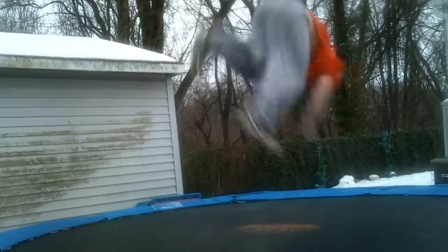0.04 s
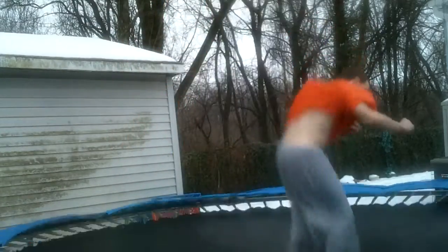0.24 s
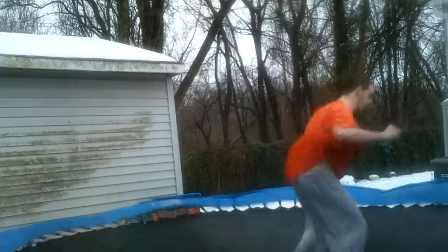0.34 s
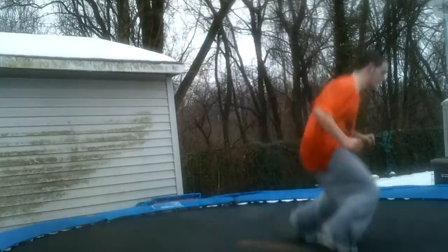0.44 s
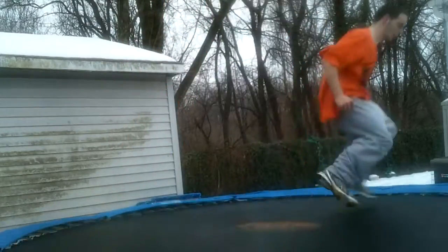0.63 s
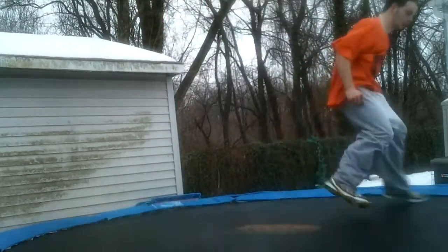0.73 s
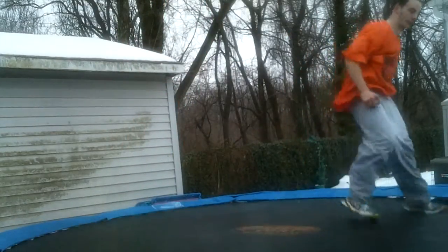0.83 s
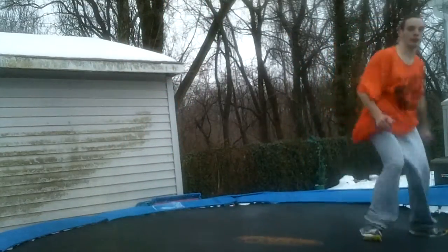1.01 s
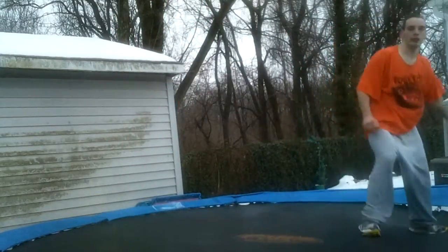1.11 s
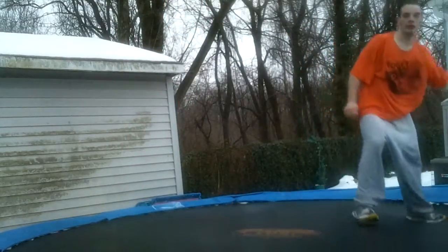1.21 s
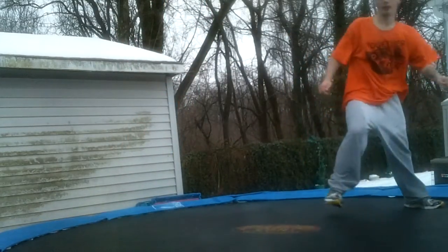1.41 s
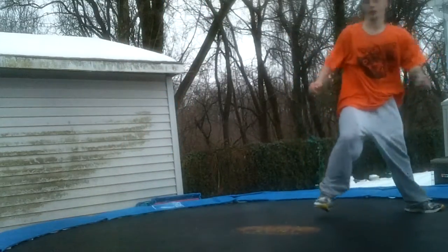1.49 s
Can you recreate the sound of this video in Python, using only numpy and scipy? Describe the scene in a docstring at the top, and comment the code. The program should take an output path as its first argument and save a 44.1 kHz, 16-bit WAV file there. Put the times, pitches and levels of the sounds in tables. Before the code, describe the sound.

A trampoline mat thumps under a jumper, then its pads slap and metal springs clank and squeak on the rebound. Quieter steps and a shoe swish follow, heard close by outdoors with light wind on the microphone.

```python
"""A bounce on a garden trampoline

A jumper lands, rebounds and takes a few small steps. The mat thumps, hisses and swishes under the shoes.
As it snaps back, pads slap the frame and the steel springs rattle, chirp and ring.
Light wind rumbles on a small camera at the rim, whose housing cuts narrow notches into the treble."""
import sys
import numpy as np
from scipy import signal
from scipy.fft import rfft, irfft
from scipy.io import wavfile
from scipy.ndimage import map_coordinates

SR = 44100
rng = np.random.default_rng(int(sys.argv[2]) if len(sys.argv) > 2 else 0)


def wav_record(signal):
    """Record a signal, one row per channel, as 16-bit PCM in the file named by sys.argv[1]."""
    frames = np.transpose(np.atleast_2d(signal))
    bounded = np.clip(frames, -1, 1)
    # unit amplitude maps onto the largest positive 16-bit level
    quanta = np.round(bounded * 32767).astype(np.int16)
    wavfile.write(sys.argv[1], SR, quanta)


N = 68355

# Wind gusts. Each row: time in seconds, level in dB.
WIND_LEVELS = [(0, -41), (.17, -41), (.22, -31), (.3, -34), (.45, -34), (.62, -33.5), (.72, -43.5),
               (.82, -32), (.96, -48), (1.05, -39), (1.2, -41.5), (1.4, -38.5), (1.45, -46.5), (1.55, -42)]
# The tone of each noise, from low to high. Each row: frequency in Hz, relative level in dB.
WIND_TONE = [(12, 5), (25, 5.5), (45, 0.5), (75, 3.5), (115, -9.5), (160, -19.5), (260, -33), (600, -52.5)]
HUSH_TONE = [(60, 13), (200, -3.5), (500, 0), (1100, -4), (1900, -10), (3200, -23), (4700, -13),
             (6500, -22.5), (8200, -31), (10000, -24.5), (15000, -27.5)]
SCUFF_TONE = [(500, -1.5), (2500, -26), (4800, 3.5), (7000, -4.5), (8500, -8), (10200, -1), (12000, -4.5),
              (14000, -12.5), (15500, -33)]
SLIDE_TONE = [(200, -26), (620, -6), (1000, -5), (2200, -2), (3200, -2), (4400, 2), (5200, 2), (6200, -28),
              (9000, -24), (15000, -34)]
TICK_TONE = [(1000, -10), (5000, 0.5), (9000, -4), (9800, -14), (10400, -9), (11400, -5), (15000, -29)]
STEEL_TONE = [(300, -13.5), (1200, -6), (2200, -3.5), (3300, -2.5), (4400, -0.5), (5100, 1.5), (5900, -4.5),
              (6900, -11), (8200, -22), (10000, -15.5), (15000, -34.5)]
SLAP_TONE = [(60, -15), (125, 0), (160, -9.5), (200, 3), (400, -10), (600, -7.5), (900, -9.5), (1200, -11),
             (1600, -12.5), (2100, -16), (3500, -22), (7000, -22.5), (15000, -63)]
# Bursts of noise. Each row: peak time in seconds, level in dB, rise and fall times in seconds.
MAT_SCUFFS = [(.312, -48, 0.00093, .014), (.331, -37.5, 0.0057, 0.014), (.354, -32.5, 0.01, 0.02),
              (.46, -48.5, 0.052, 0.036), (.53, -46, 0.0065, 0.15), (.645, -40.5, 0.0016, 0.0026),
              (.96, -50.5, 0.023, 0.014), (1.02, -51.5, 0.034, 0.051), (1.072, -55.5, 0.031, 0.013),
              (1.166, -58, .002, 0.023), (1.31, -54, 0.0023, .006), (1.332, -56.5, 0.0064, .01),
              (1.375, -53.5, 0.0077, 0.0075)]  # shoes and clothes brushing the mat
SOLE_SLIDES = [(1.062, -44.5, 0.025, 0.018)]  # a sole sliding
SPRING_RATTLES = [(0, -45.5, .005, 0.009), (.036, -52, 0.0072, 0.0084), (.313, -40.5, 0.0013, 0.048),
                  (.352, -40, 0.011, 0.009), (.403, -41.5, 0.0061, 0.037), (.452, -37.5, 0.0049, 0.0063),
                  (.477, -37, 0.01, 0.017), (.526, -18, 0.0088, 0.013), (.549, -25.5, 0.011, 0.049),
                  (.621, -30, 0.02, 0.019), (.858, -47, 0.0065, 0.074), (.968, -45, 0.0041, 0.0033),
                  (1.066, -47, 0.05, 0.025), (1.145, -56, 0.0036, 0.017), (1.312, -54.5, 0.0049, 0.0055),
                  (1.328, -54.5, 0.0043, 0.0083), (1.37, -58, 0.0028, 0.0026), (1.53, -61, 0.074, 0.057)]  # springs shaking
PAD_SLAPS = [(.3125, -35.5, 0.0008, 0.0095), (.331, -37.5, 0.0044, 0.0076), (.378, -36, 0.0052, 0.0098),
             (.406, -33, 0.0066, 0.021), (.478, -34, 0.0082, 0.0068), (.526, -22.5, 0.0091, 0.012),
             (.536, -33, 0.0025, 0.0042), (.550, -27.5, 0.015, 0.017), (.605, -34, 0.0075, 0.01),
             (.622, -34.5, 0.011, 0.023), (.859, -47, 0.0079, 0.013), (.922, -48, 0.016, 0.023),
             (.97, -49, 0.0049, 0.0069)]  # mat and edge pads clapping
FRAME_THUDS = [(.313, -31, 0.00084, 0.0049), (.330, -26, 0.002, 0.0031), (.402, -29, 0.0042, 0.0031),
               (.521, -26, 0.0029, 0.016), (.584, -27, 0.0021, 0.0052), (.858, -45.5, 0.0034, 0.025),
               (.922, -51.5, .003, 0.0091)]  # hollow thuds of feet and frame
# Short, rough gliding tones in the swish of the mat. Each row: peak time in seconds, level in dB,
# rise and fall times in seconds, pitch in Hz, glide in octaves per second.
SWISH_GLIDES = [(.333, -43, .006, 0.015, 2364, -9), (.413, -42, 0.0065, 0.013, 1272, 3.5),
                (1.048, -50.5, 0.022, 0.011, 2150, -11), (1.075, -49, 0.0056, 0.011, 990, 0),
                (1.08, -50, 0.0056, 0.01, 644, 0.5)]
# Spring hooks turning in their holes. Each row: peak time in seconds, level in dB, pitch in Hz.
HOOK_CHIRPS = [(.526, -14, 5100), (0.6044, -19, 4800), (0.618, -27.5, 4590), (0.636, -28.5, 4600),
               (0.647, -36, 4900), (0.6765, -34, 10240), (1.311, -51, 5000), (1.325, -54, 3810),
               (1.329, -48, 5250), (1.377, -46, 5240), (1.4413, -58.5, 4080)]
# Sharp hits of the hooks. Each row: start in seconds, level in dB.
HOOK_CLANKS = [(.5172, -36), (.5207, -18.5), (.5248, -18), (.5260, -23), (.5305, -18.5), (.5405, -16),
               (.5485, -14), (.6028, -39), (.6053, -23), (.6165, -26), (.634, -31)]  # knocks on the frame
HOOK_TICKS = [(.6028, -22.5), (.6765, -32), (.7876, -45), (.83, -55)]  # thin, bright ticks
# The notes each steel part rings at. Each row: pitch in Hz, relative level in dB, seconds to fade 60 dB.
HOOK_NOTES = [(6550, 1, 0.45), (7110, 0, .22)]
SPRING_NOTES = [(1260, -15, 0.17), (1955, -1, 0.77), (3890, 4, 0.14), (4356, 2, 0.4), (4530, -9, .4),
                (5000, -13, 0.29), (4710, 15, 0.1), (5030, 11, 0.26)]
FRAME_NOTES = [(124, -4, 0.06), (214.4, -0.5, 0.083), (271, -5.5, 0.116), (336, 1.5, 0.087),
               (366, -4.5, 0.096)]
# Deep thumps of the mat. Each row: start in seconds, level in dB, pitch in Hz.
MAT_THUMPS = [(0.312, -19, 75.6), (0.325, -19, 69.4), (0.365, -18, 30), (0.392, -18, 55.5),
              (0.445, -18.5, 38), (0.527, -17.5, 63), (0.547, -12, 49.5), (0.601, -34, 71.5),
              (0.777, -34, 65), (0.849, -22, 46.7), (1.029, -30.5, 124), (1.155, -26.5, 61.4),
              (1.171, -19.5, 61), (1.265, -26.5, 42.3), (1.354, -27, 51)]
# Bands that the camera housing weakens. Each row: centre in Hz, width in Hz, level at the centre in dB.
HOUSING_NOTCHES = [(2683, 745, -46), (5507, 730, -47), (7820, 2240, -28), (10890, 770, -39),
                   (12700, 1600, -5.5)]


def gain(db):
    """Turn decibels into a number to multiply by."""
    return 10 ** (np.asarray(db) / 20)


def unit(x):
    """Scale a sound to an average power of 1."""
    return x / np.sqrt(np.mean(x ** 2) + 1e-18)


def since(start):
    """Seconds since a moment, negative before it."""
    return np.arange(N) / SR - start


def through(x, response):
    """Pass a sound through a filter, given as its response to one click and scaled to energy 1."""
    return signal.fftconvolve(x, response / np.sqrt(np.sum(response ** 2)))[:N]


def shape_tone(x, points, size=8192):
    """Shape the lows and highs of a sound to follow a tone table."""
    hz, db = np.array(points, float).T
    freqs = np.maximum(np.fft.rfftfreq(size, 1 / SR), 1)
    curve_db = np.interp(np.log(freqs), np.log(hz), db)
    cepstrum = irfft(np.log(gain(curve_db)))
    # Folding onto the first half keeps the filter from sounding ahead of a hit.
    cepstrum[1:size // 2] *= 2
    cepstrum[size // 2 + 1:] = 0
    return through(x, irfft(np.exp(rfft(cepstrum))))


def swells(table):
    """A loudness curve of bursts that each rise to a peak and die away."""
    power = 0
    for peak, db, rise, fall in table:
        t = since(peak)
        burst = gain(db) * np.exp(-np.maximum(-t / rise, t / fall))
        power = power + burst ** 2
    return np.sqrt(power)


def contacts(per_s, scatter_db):
    """A stream of tiny random hits of uneven size."""
    hit = rng.random(N) < per_s / SR
    size = gain(scatter_db * np.clip(rng.standard_normal(N), -2, 2))
    return unit(hit * size * rng.choice([-1, 1], N))


def cracks(table, decay_s):
    """Each hard hit is a sudden, very short burst of noise."""
    level = 0
    for start, db in table:
        t = since(start)
        level = level + gain(db) * (t >= 0) * np.exp(-np.abs(t) / decay_s)
    return level * rng.choice([-1, 1], N)


def fade(fade_s):
    """A curve that drops by 60 dB every fade_s seconds."""
    return np.exp(-np.log(1000) * since(0) / fade_s)


def tail(x, fade_s):
    """Smear a sound into a dense, dying echo."""
    return through(x, rng.standard_normal(N) * fade(fade_s))


def ring(x, notes):
    """Hits make a part ring at its own fading notes."""
    t = since(0)
    response = sum(gain(db) * np.sin(2 * np.pi * hz * t) * fade(fade_s) for hz, db, fade_s in notes)
    return through(x, response)


def whine(hz, width_hz):
    """A rough tone that wavers in level and pitch."""
    smooth = signal.butter(2, width_hz / 2, fs=SR, output="sos")
    size, drift = (unit(signal.sosfilt(smooth, rng.standard_normal(N))) for _ in range(2))
    pitch = hz + drift * width_hz / 2
    return unit(gain(2 * size) * np.sin(2 * np.pi * np.cumsum(pitch) / SR))


def wind_and_hush(hush_db=-51.5):
    """Wind buffets the microphone over a steady, distant hush."""
    gusts = gain(np.interp(since(0), *np.array(WIND_LEVELS).T))
    rumble = gusts * shape_tone(rng.standard_normal(N), WIND_TONE)
    return rumble + gain(hush_db) * shape_tone(rng.standard_normal(N), HUSH_TONE)


def scuffs():
    """Soles and cloth catch on the threads of the mat."""
    return shape_tone(swells(MAT_SCUFFS) * contacts(per_s=7500, scatter_db=6.5), SCUFF_TONE)


def sole_slide(swish_hz=1004, fall_s=0.043, depth=0.65):
    """A sole rubs over the mat with a swish that falls in pitch as it slows."""
    rub = contacts(per_s=6800, scatter_db=2.5)
    # Adding a delayed copy makes evenly spaced pitches stand out; they sink as the delay grows.
    t = since(SOLE_SLIDES[0][0])
    delay = SR / swish_hz * np.exp(np.clip(t / fall_s, -2, 2))
    delayed = map_coordinates(rub, [np.arange(N) - delay], mode="mirror")
    swish = unit(rub + depth * delayed)
    return shape_tone(swells(SOLE_SLIDES) * swish, SLIDE_TONE)


def swish_glides():
    """Short, rough gliding tones sound in the swish of the mat."""
    out = 0
    for peak, db, rise, fall, hz, glide in SWISH_GLIDES:
        pitch = hz * 2 ** np.clip(glide * since(peak), -1, 1)
        out = out + swells([(peak, db, rise, fall)]) * whine(pitch, width_hz=120)
    return out


def hook_chirps(rise_s=0.001, fall_s=0.0021):
    """A tightly pulled hook slips in its hole and sings for a few milliseconds."""
    return sum(swells([(peak, db, rise_s, fall_s)]) * whine(hz, width_hz=604)
               for peak, db, hz in HOOK_CHIRPS)


def springs():
    """Hooks chatter, knock and tick in the frame; the coils ring on."""
    chatter = swells(SPRING_RATTLES) * contacts(per_s=2200, scatter_db=3.5)
    blows = chatter + cracks(HOOK_CLANKS, decay_s=0.0016)
    steel = shape_tone(blows, STEEL_TONE)
    taps = cracks(HOOK_TICKS, decay_s=0.0025)
    ticks = shape_tone(taps, TICK_TONE) + gain(-16) * ring(taps, HOOK_NOTES)
    ringing = gain(-21) * ring(blows, SPRING_NOTES)
    coil_shimmer = gain(-20) * tail(steel, fade_s=0.45)
    return steel + ringing + coil_shimmer + ticks


def mat_slaps():
    """Mat and pads clap in many soft hits; the heavy ones also make the frame thud."""
    claps = swells(PAD_SLAPS) * contacts(per_s=2200, scatter_db=2.5)
    thuds = swells(FRAME_THUDS) * contacts(per_s=4000, scatter_db=2.0)
    return shape_tone(claps, SLAP_TONE) + ring(thuds, FRAME_NOTES)


def mat_thumps(attack_s=0.0044, decay_s=0.01, overtone_ratio=1.68, overtone_db=-16):
    """Each push sets the tight mat swinging briefly, with a deep note and a weaker, higher one."""
    out = 0
    for start, db, hz in MAT_THUMPS:
        t = np.maximum(since(start), 0)
        phase = 2 * np.pi * hz * t
        swing = np.sin(phase) + gain(overtone_db) * np.sin(overtone_ratio * phase)
        out = out + gain(db) * swing * (1 - np.exp(-t / attack_s)) * np.exp(-t / decay_s)
    return out


def scene():
    """The trampoline in light wind, with a faint echo from shed and trees."""
    near = mat_slaps() + springs() + hook_chirps() + scuffs() + sole_slide() + swish_glides()
    echo = gain(-20) * tail(near, fade_s=0.88)
    return (near + mat_thumps() + echo + wind_and_hush())[None]


def record(dry, ceiling_db=-7, top_hz=15150):
    """The housing notches the treble; the camera rounds off loud peaks and cuts the highest sounds."""
    for hz, width, depth_db in HOUSING_NOTCHES:
        b, a = signal.iirnotch(hz, hz / width, fs=SR)
        dry = gain(depth_db) * dry + (1 - gain(depth_db)) * signal.lfilter(b, a, dry)
    rounded = dry / (1 + (dry / gain(ceiling_db)) ** 4) ** 0.25
    treble_cut = signal.ellip(10, .2, 80, top_hz, fs=SR, output="sos")
    return signal.sosfilt(treble_cut, rounded)


dry = scene()
out = record(dry)
wav_record(out)
```